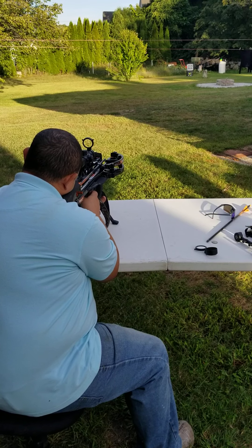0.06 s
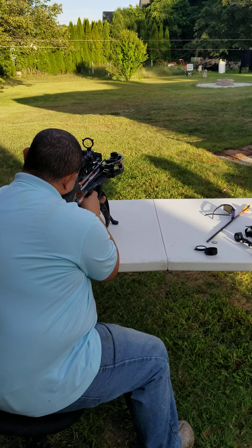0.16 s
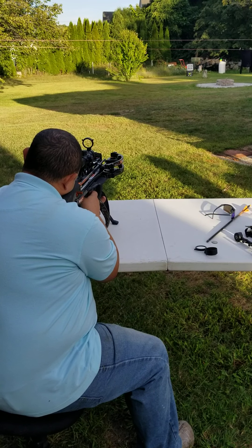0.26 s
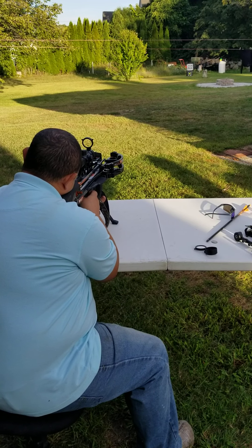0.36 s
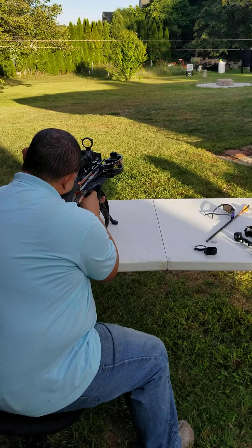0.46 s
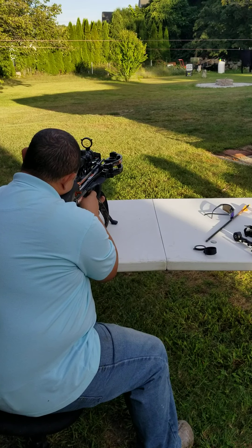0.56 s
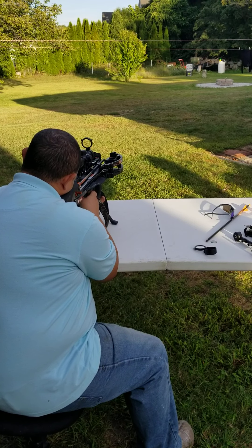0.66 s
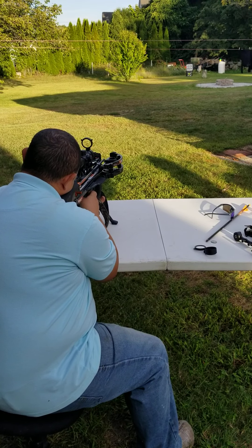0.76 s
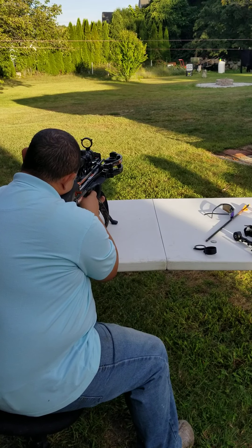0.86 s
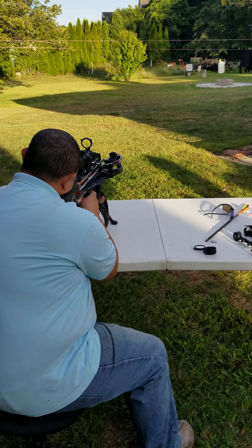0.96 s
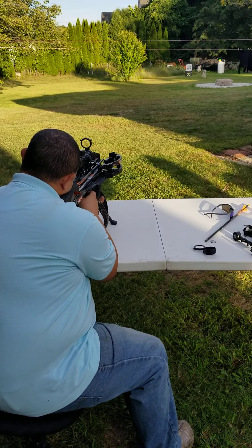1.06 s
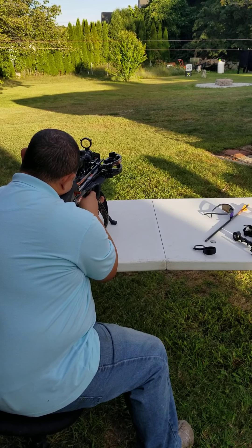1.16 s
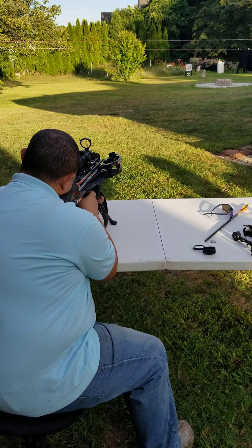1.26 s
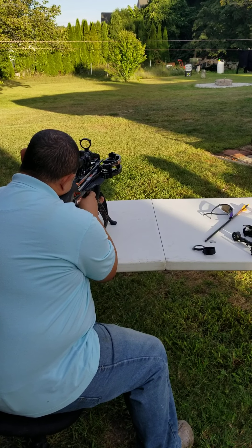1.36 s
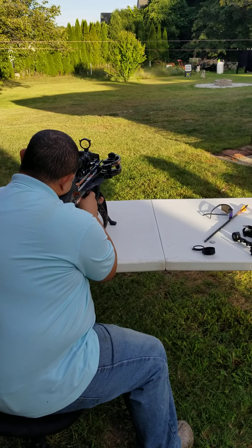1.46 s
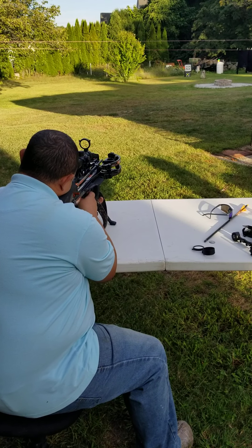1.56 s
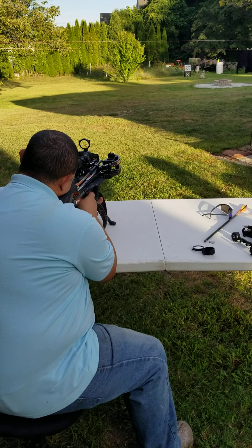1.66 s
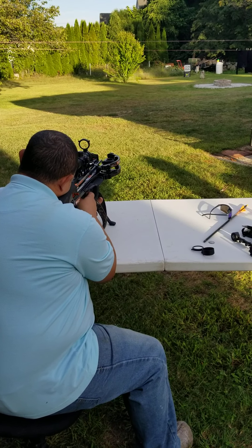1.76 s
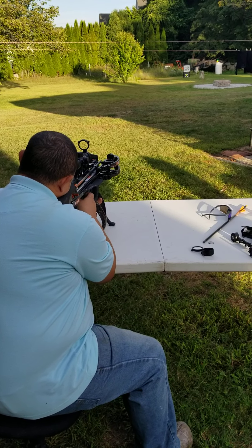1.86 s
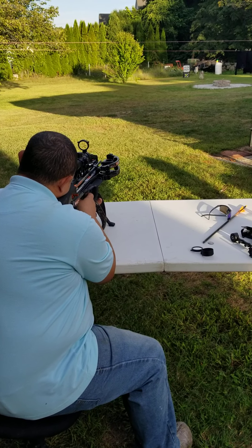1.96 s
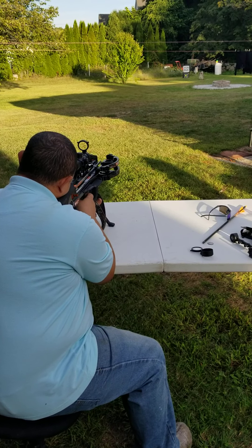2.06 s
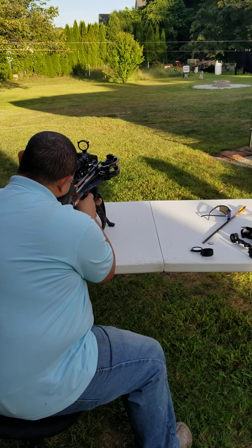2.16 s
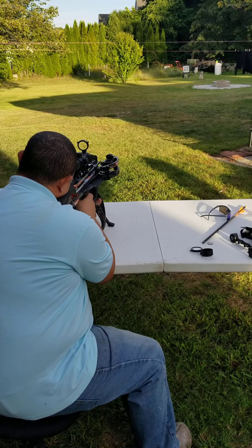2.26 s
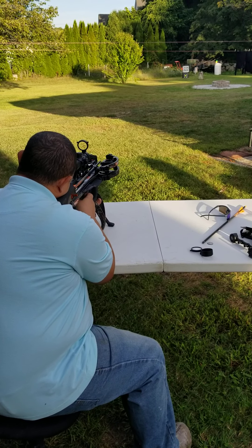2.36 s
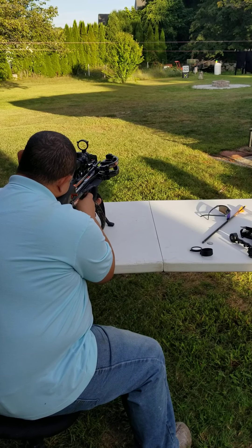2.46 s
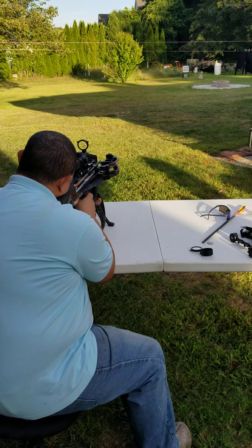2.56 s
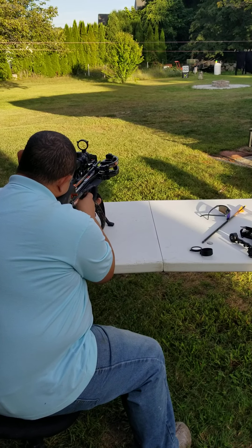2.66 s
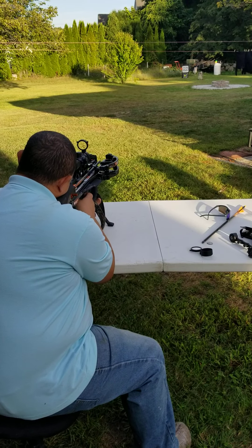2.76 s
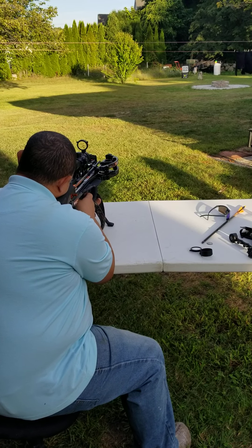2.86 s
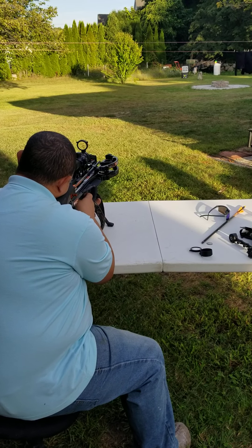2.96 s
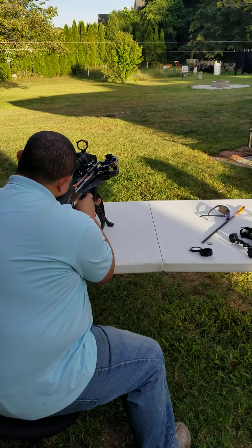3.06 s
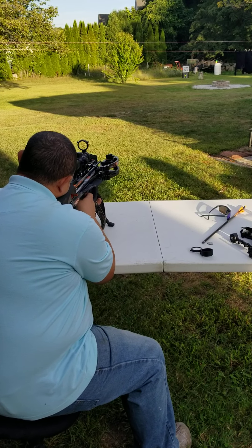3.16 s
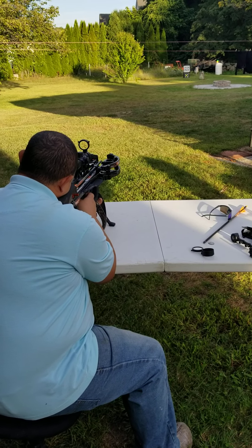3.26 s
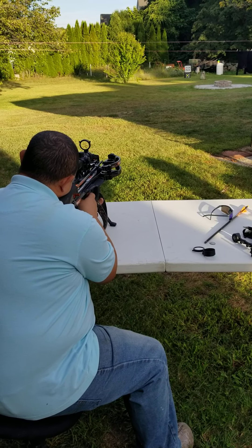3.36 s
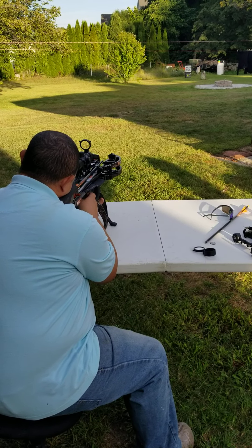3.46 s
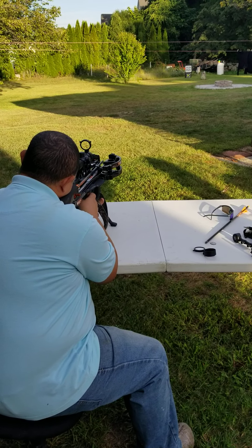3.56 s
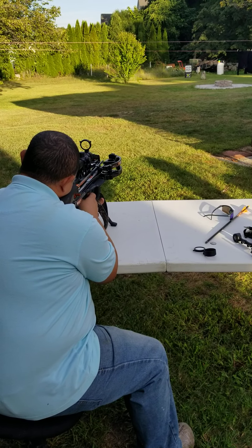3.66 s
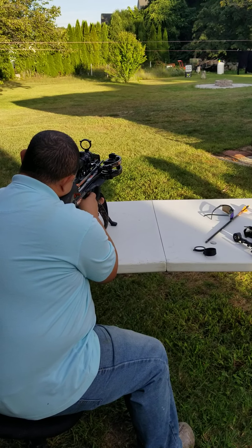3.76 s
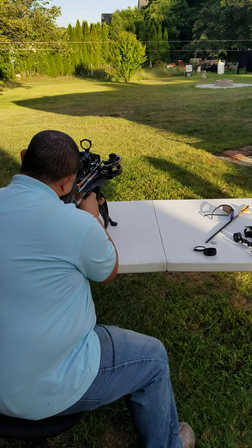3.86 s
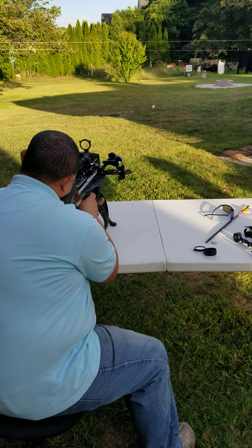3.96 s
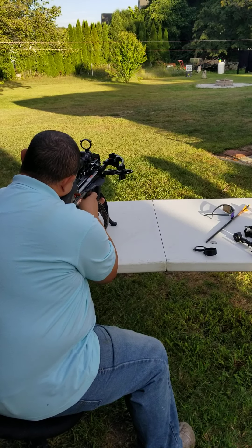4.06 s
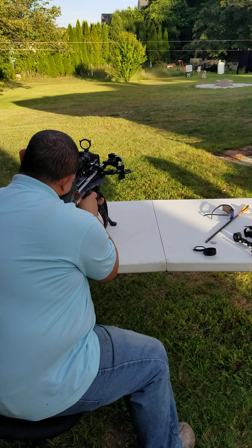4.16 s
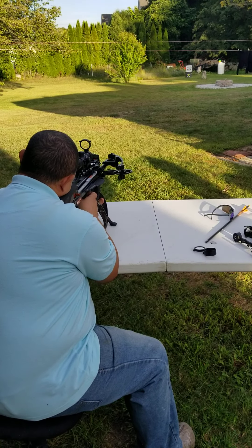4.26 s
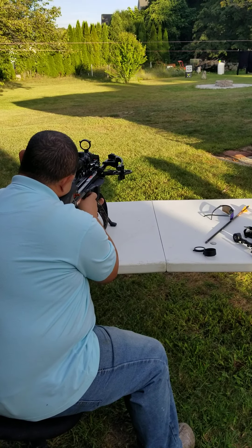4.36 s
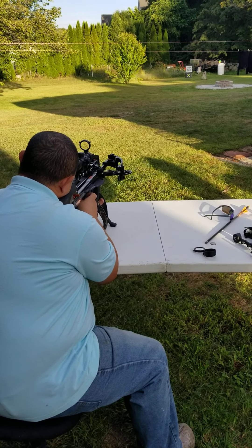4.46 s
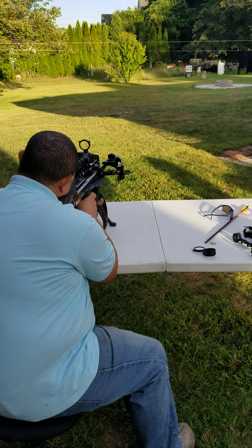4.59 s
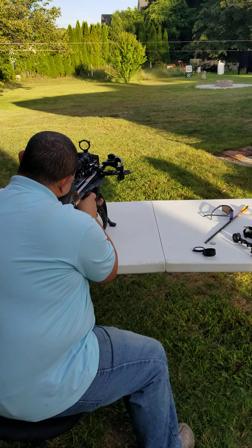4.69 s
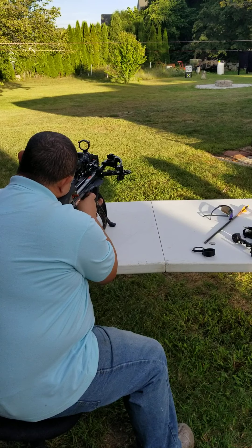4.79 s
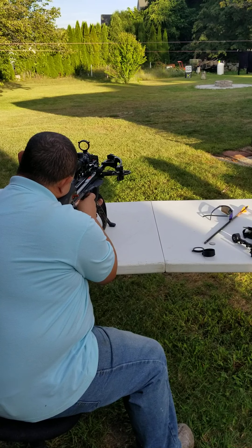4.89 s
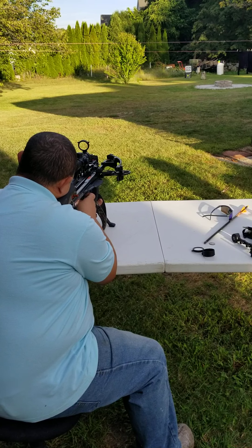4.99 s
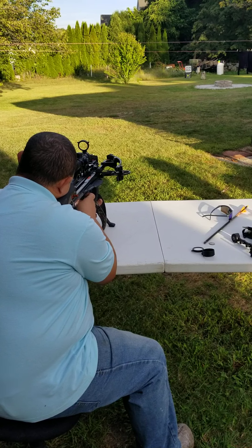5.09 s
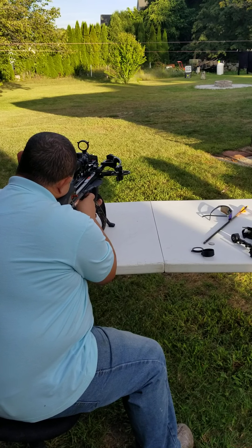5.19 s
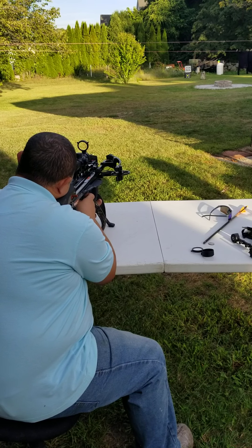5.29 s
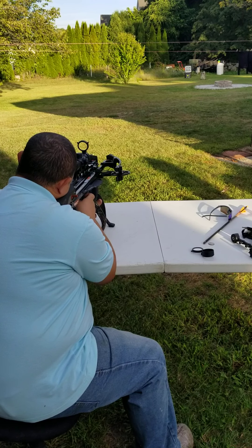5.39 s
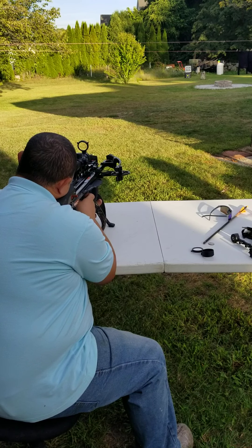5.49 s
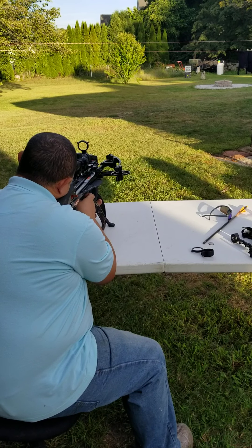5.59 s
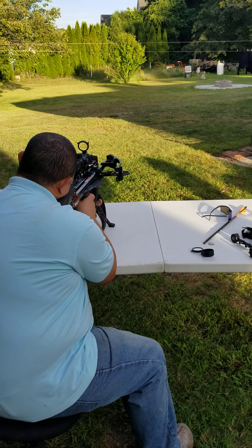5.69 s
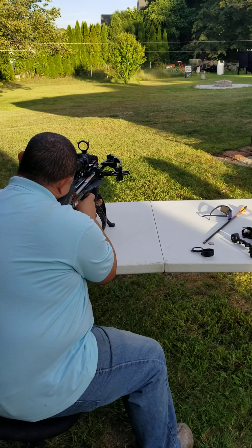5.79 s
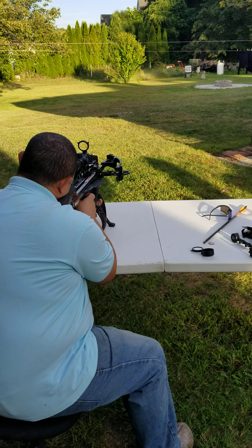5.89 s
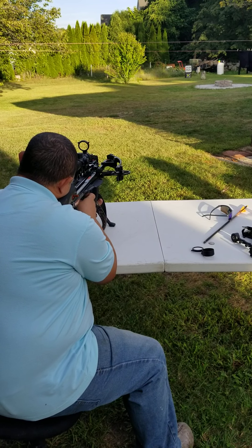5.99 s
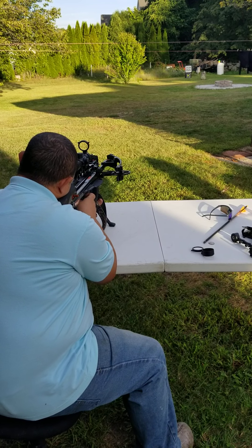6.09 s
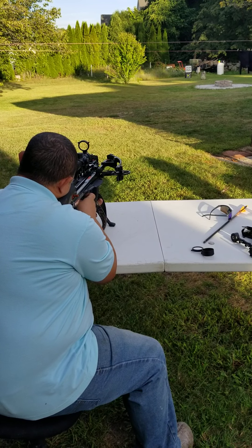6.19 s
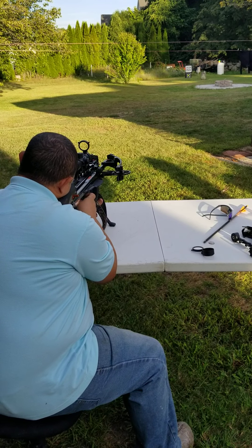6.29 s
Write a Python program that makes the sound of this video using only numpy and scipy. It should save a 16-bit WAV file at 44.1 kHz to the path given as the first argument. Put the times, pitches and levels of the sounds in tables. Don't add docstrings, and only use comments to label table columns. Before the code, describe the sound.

A quiet backyard hum with faint cricket and bird notes, then one sharp loud crossbow snap, and moments later a faint knock at a far target.

```python
import sys
import numpy as np
from scipy import signal
from scipy.io import wavfile
from scipy.ndimage import uniform_filter1d

SR = 44100
rng = np.random.default_rng(int(sys.argv[2]) if len(sys.argv) > 2 else 0)


def elevation(decibels):
    levels = np.asarray(decibels, float)
    return 10 ** (levels / 20)


def persist_wave(psi):
    counts = np.round(np.clip(psi, -1, 1) * 32767).astype(np.int16)
    wavfile.write(sys.argv[1], SR, np.atleast_2d(counts).T)


N = 279594
T = np.arange(N) / SR
DUCK_DB = 23

SNAP_TIMES = [
    3.9808,
    3.9822,
    3.9892,
    3.9975,
    4.0115,
]
# (frequency [Hz], left minus right [dB])
BOW_LEAN = [(300, -1.5), (4000, 0.5), (7000, 1), (11000, -3), (15000, 12)]
# (frequency [Hz], level [dB per Hz])
THIN_COLOUR = [(8600, -40.5), (9800, -11), (12000, -5), (14500, 1.5), (16000, -5.5)]


def evened(x):
    return x / np.sqrt(np.mean(x ** 2) + 1e-20)


def read(points, hz):
    f, value = np.transpose(points)
    return np.interp(np.log(hz + 1), np.log(f + 1), value)


def coloured(x, colour):
    hz = abs(np.fft.fftfreq(4096, 1 / SR))
    log_gain = np.log(elevation(np.maximum(read(colour, hz), -100)))
    phase = -signal.hilbert(log_gain).imag
    taps = np.fft.ifft(np.exp(log_gain + 1j * phase)).real[:2048]
    return signal.oaconvolve(x, taps / np.linalg.norm(taps))[:len(x)]


def whistle(hz, width, steady=0.):
    r = np.exp(-np.pi * width / SR)
    a, b = signal.lfilter([1], [1, -2 * r, r * r], rng.standard_normal((2, 2, len(hz))))
    slow = (a + 1j * b) / np.sqrt(np.mean(a ** 2))
    slow[1] = slow[0] + 0.11 * slow[1]
    carrier = np.exp(2j * np.pi * np.cumsum(hz) / SR)
    return ((steady + slow) * carrier).real * np.sqrt(2 / (2 + steady ** 2))


def ported(level, colour, same, lean):
    a, b = rng.standard_normal((2, N))
    same = np.clip(same, -1, 1)
    left, right = level * np.array([a, same * a + np.sqrt(1 - same ** 2) * b])
    left_colour = [(f, db + read(lean, f) / 2) for f, db in colour]
    right_colour = [(f, db - read(lean, f) / 2) for f, db in colour]
    return np.array([coloured(left, left_colour), coloured(right, right_colour)])


def bursts(rows, colour, same=.6, lean=((100, 0), (9000, 0))):
    level = np.zeros((2, N))
    for s, db, rise_ms, t60_ms, pan_db in rows:
        ms = np.arange(0, 3 * t60_ms, 1000 / SR)
        shape = np.minimum(ms / rise_ms, 1) * elevation(-60 * ms / t60_ms)
        part = level[:, round(s * SR):][:, :len(ms)]
        part += elevation([[db + pan_db / 2], [db - pan_db / 2]]) * shape[:part.shape[1]]
    return ported(level, colour, same, lean)


def clicks(rows, colour):
    spikes = np.zeros((2, N))
    for s, db, pan_db in rows:
        at = round(s * SR) + np.array([0, 2])
        spikes[[0, 1], at] = -elevation([db + pan_db / 2, db - pan_db / 2])
    return np.array([coloured(x, colour) for x in spikes])


def wash():
    # (frequency [Hz], level [dB per Hz])
    wash_colour = [(18, -38), (30, -15), (70, -6.5), (109, -8), (303, -20.5), (600, -24), (962, -20),
                   (1630, -24), (2480, -35), (5310, -47), (7090, -40.5), (7870, -55), (8520, -99),
                   (11700, -61.5), (16000, -62)]
    # (frequency [Hz], likeness of the ports [-1 to 1])
    wash_same = [(60, 0.99), (180, 0.95), (550, 0.8), (1650, 0.25), (4970, -0.37), (15000, 0.36)]
    # (frequency [Hz], left minus right [dB])
    wash_lean = [(60, -1.5), (180, 0), (550, 0.5), (1650, -2.5), (4970, 0), (15000, 7)]
    count, hz = N // 512 + 5, np.fft.rfftfreq(2048, 1 / SR)
    a, b, c, d, patches = rng.standard_normal((count, 1025, 5)).T
    patches = uniform_filter1d(patches, size=20, axis=0)
    patches = evened(uniform_filter1d(patches, size=10, axis=1))
    same = np.clip(read(wash_same, hz), -1, 1)[:, None]
    left = a + 1j * b
    right = same * left + np.sqrt(1 - same ** 2) * (c + 1j * d)
    lean = elevation(read(wash_lean, hz) / 2)[:, None]
    spectra = np.array([left * lean, right / lean])
    spectra = spectra * elevation(read(wash_colour, hz)[:, None] + 0.66 * patches)
    return elevation(-37) * evened(signal.istft(spectra, nperseg=2048, noverlap=1536)[1][:, :N])


def hum():
    # (time [s], shaft speed [Hz])
    shaft_curve = [(0, 68.92), (2.9, 67.86), (5.3, 66.35), (6.34, 65.8)]
    # (time [s], level before gain control [dB])
    hum_curve = [(0, -36), (1.2, -44.5), (2, -36), (3.1, -37.5), (3.9, -36.5), (4.6, -41), (5.3, -40),
                 (5.6, -31), (6.34, -30.5)]
    # (multiple of shaft speed [-], level [dB])
    hum_orders = [(2, -2), (3, -9.5), (4, -18.5), (5, -20.5), (6, -21.5), (8, -23)]
    hz = np.interp(T, *np.transpose(shaft_curve))
    tones = sum(elevation(db) * whistle(order * hz, 5.7, 4.5) for order, db in hum_orders)
    return elevation(np.interp(T, *np.transpose(hum_curve))) * tones


def engine():
    # (time [s], firing rate [Hz], level [dB])
    engine_curve = [(0, 84.1, -34.5), (.45, 83.9, -42.5), (.75, 84.4, -33), (1.001, 85.1, -39.5),
                    (1.18, 87.04, -24), (1.37, 91.06, -35.5), (1.7, 92.5, -30), (1.82, 94.1, -41),
                    (2.0, 94.5, -32.5), (2.3, 95, -43.5), (2.431, 95, -30.5), (2.65, 95, -33),
                    (2.9, 94.95, -27), (3.4, 94.8, -33.5), (3.55, 83, -30.5), (4.0, 82.1, -36),
                    (4.8, 94.46, -46), (6.34, 102, -39.5)]
    s, *columns = np.transpose(engine_curve)
    hz, db = (np.interp(T, s, column) for column in columns)
    return elevation(db) * whistle(hz, 43, 3.0) + elevation(-41.5) * whistle(hz * .53, 20)


def chorus():
    # (centre [Hz], width [Hz], level [dB])
    insect_bands = [
        (4140, 980, -65),
        (7040, 340, -70.5),
        (1784, 580, -55),
    ]
    swell_s, swell_db = 4.6, 8.5
    bands = []
    for hz, width, db in insect_bands:
        ports = [whistle(np.full(N, hz), width)[0] for _ in range(2)]
        bands.append(elevation(db) * np.array(ports))
    swell = elevation(swell_db * np.clip((T - swell_s) * 10, 0, 1))
    return sum(bands) + (swell - 1) * bands[1]


def hiss():
    # (time [s], level [dB])
    hiss_curve = [(0, -92.5), (5.43, -84), (5.451, -100), (6.34, -94)]
    return ported(elevation(np.interp(T, *np.transpose(hiss_curve))), THIN_COLOUR, 0, BOW_LEAN)


def notes():
    # (start [s], end [s], throbs [per s])
    note_spans = [(1.728, 2.075, 38.4), (1.728, 2.075, 38.4), (2.185, 2.237, 2), (.68, .92, 38),
                  (1.75, 2.25, 36), (5.5, 6.2, 38), (2.158, 2.176, 2)]
    # (base pitch [Hz], top pitch of the slide [Hz], level [dB])
    note_pitches = [(3620, 3820, -52.5), (3480, 3620, -63), (5170, 5330, -63.5), (4130, 4200, -69.5),
                    (4120, 4130, -69), (3750, 3850, -68), (4080, 4120, -65)]
    out = np.zeros((2, N))
    for (t0, t1, throbs), (hz0, hz1, db) in zip(note_spans, note_pitches):
        t = np.arange(0, t1 - t0, 1 / SR)
        u = t / (t1 - t0)
        throb = .36 + np.sin(np.pi * throbs * t + 1.95) ** 2
        slide = (hz1 - hz0) * np.sin(np.pi * (.05 + .75 * u)) ** .6
        hz = hz0 + slide + 60 * np.sin(2 * np.pi * throbs * t)
        swell = np.sin(np.pi * u) ** .2
        out[:, round(t0 * SR):][:, :len(t)] += elevation(db) * throb * swell * whistle(hz, 260, 3.2)
    return out * elevation([[1.5], [-1.5]])


def ticks():
    # (time [s], peak [dB], rise [ms], fall by 60 dB [ms], left minus right [dB])
    thin_ticks = [
        (2.395, -82, 3, 79.3, 3),
    ]
    # (time [s], peak [dB], rise [ms], fall by 60 dB [ms], left minus right [dB])
    dull_ticks = [
        (4.394, -48.5, 2.8, 60, -1),
        (4.6585, -64, 0.31, 13, -0.5),
        (5.44, -55, 0.31, 15.6, -14),
    ]
    # (time [s], peak [dB], left minus right [dB])
    knocks = [
        (4.6588, -28.5, 2),
        (5.4405, -56, 0),
    ]
    # (frequency [Hz], level [dB per Hz])
    dull_colour = [(60, -8), (200, 0), (500, -4), (1200, -14), (2800, -24), (4000, -40), (14000, -42)]
    dull = bursts(dull_ticks, dull_colour, 0.59) + clicks(knocks, dull_colour)
    return dull + bursts(thin_ticks, THIN_COLOUR, .6)


def gain_control():
    drop_s, fall_s, drop_db = 3.972, .008, -23.5
    sag_db, sag_until_s, creep_db_per_s = -2.5, 4.53, 2.5
    fall = drop_db * np.clip((T - drop_s) / fall_s, 0, 1)
    sag = sag_db * np.clip((T - drop_s) / (sag_until_s - drop_s), 0, 1)
    return elevation(fall + sag + creep_db_per_s * np.maximum(T - sag_until_s, 0))


def snaps():
    # (peak [dB], rise [ms], fall by 60 dB [ms], left minus right [dB])
    snap_shapes = [
        (-23.5, 0.56, 15, 4.5),
        (-15, 0.27, 31, -2.5),
        (-13.5, .4, 6.9, 7),
        (-27, 2.1, 49, 0.5),
        (-28.5, 3, 61, -1.5),
    ]
    # (frequency [Hz], level [dB per Hz])
    snap_colour = [(120, -46), (300, -12), (900, -2.5), (2000, -1.5), (2960, -15), (4130, -9.5),
                   (5200, -11.5), (6800, -14), (8030, -29), (11000, -17), (15000, -5), (16500, -24)]
    rows = [(s, *row) for s, row in zip(SNAP_TIMES, snap_shapes)]
    return bursts(rows, snap_colour, 0.11, BOW_LEAN)


def limbs():
    # (pitch [Hz], peak [dB], delay [ms], rise [ms], fall by 60 dB [ms], left minus right [dB])
    limb_rings = [(6800, -15, 0, .4, 10, 7), (6800, -15.5, 7.2, .3, 8, 10), (4200, -9, .4, 1.2, 13, -3),
                  (1700, -17, 0, 1.2, 12, 4), (2020, -17, 0, .8, 16, 0), (950, -16.5, 1.8, 1.8, 20, 2),
                  (190, -26, 6.5, 2.5, 30, 12), (440, -34, 12, 8, 140, 0), (870, -32, 10, 8, 120, 0),
                  (1320, -35, 10, 8, 130, 0), (445, -55, 125, 25, 220, 0), (885, -56, 105, 20, 180, 0)]
    out = np.zeros((2, N))
    ms = np.arange(SR // 2) * 1000 / SR
    starts = rng.random((len(limb_rings), 2, 1))
    for (hz, db, delay_ms, rise_ms, t60_ms, pan_db), start in zip(limb_rings, starts):
        ring = elevation(db - 60 * np.minimum(ms / t60_ms, 3)) * np.minimum(ms / rise_ms, 1)
        offset = np.cumsum(start * [[1], [hz / 12000]], axis=0)
        turn = hz * ms / 1000 + offset
        at = round((SNAP_TIMES[1] + delay_ms / 1000) * SR)
        out[:, at:at + len(ms)] += elevation([[pan_db / 2], [-pan_db / 2]]) * ring * np.sin(2 * np.pi * turn)
    return out


def yard():
    # (time [s], peak [dB], rise [ms], fall by 60 dB [ms], left minus right [dB])
    near_echoes = [
        (3.986, -25, 18, 99, 1),
        (4.008, -34.5, 7.3, 140, 1),
        (4.0, -59, 10, 1100, 0),
    ]
    # (frequency [Hz], level [dB per Hz])
    near_colour = [(120, -31.5), (200, -5), (411, -6.5), (770, -9), (844, -2), (1130, -19.5), (1340, -9.5),
                   (1550, -20), (1940, -10), (6320, -11), (8810, -28.5), (15000, -18), (16500, -27)]
    # (time [s], peak [dB], rise [ms], fall by 60 dB [ms], left minus right [dB])
    far_echoes = [
        (4.02, -33.5, 26, 95, 0.0014),
        (4.118, -47, 29, 140, 0),
        (4.03, -60.5, 20, 1330, 0),
    ]
    # (frequency [Hz], level [dB per Hz])
    far_colour = [(100, -27), (300, 2.5), (500, -3), (1500, -6.5), (2600, -10.5), (4000, -23.5),
                  (7000, -28), (15000, -37.5)]
    near = bursts(near_echoes, near_colour, .2, BOW_LEAN)
    return near + bursts(far_echoes, far_colour, 0.5, BOW_LEAN)


def puff():
    # (dent [dB], dent decay [ms], swing [dB], swing pitch [Hz], swing decay [ms])
    puff_settings = (-0.9, 3, -1, 55, 22)
    dent_db, dent_ms, swing_db, hz, swing_ms = puff_settings
    ms = np.maximum(T - 3.9893, 0) * 1000
    onset = 1 - np.exp(-(ms / 0.13) ** 2)
    dent = -elevation(dent_db) * onset * np.exp(-np.maximum(ms - .4, 0) / dent_ms)
    turn = hz * ms / 1000 + 0.073 * (1 - np.exp(-ms / 7.7))
    wave = np.sin(2 * np.pi * turn)
    swing = elevation(swing_db) * np.exp(-(ms / swing_ms) ** 2) * wave
    settle = elevation(-33.5) * np.exp(-ms / 45) * wave
    return np.array([-.17 * swing, dent + swing + settle])


def impact():
    # (time [s], peak [dB], left minus right [dB])
    cracks = [
        (4.3914, -14.5, 3),
        (4.3934, -25, 0),
        (4.3959, -26, 5),
    ]
    # (time [s], peak [dB], rise [ms], fall by 60 dB [ms], left minus right [dB])
    strikes = [
        (4.3916, -43, .2, 12, 0),
        (4.3933, -44, .2, 9, -1),
        (4.3962, -48, .3, 25, 1),
    ]
    # (frequency [Hz], level [dB per Hz])
    strike_colour = [(200, -26), (1500, -30), (3900, -20), (4800, 1), (5400, -6), (6200, -2), (7400, -7),
                     (9000, -33), (12500, -19), (15500, -14), (16500, -29)]
    # (time [s], peak [dB], rise [ms], fall by 60 dB [ms], left minus right [dB])
    hedge_echoes = [
        (4.398, -61, 4, 450, 0),
        (4.45, -70, 4.3, 54, 0),
    ]
    # (frequency [Hz], level [dB per Hz])
    hedge_colour = [(500, -22), (2000, -5), (4500, -4), (7000, -8), (8600, -36), (14000, -22), (16500, -27)]
    strike = clicks(cracks, strike_colour) + bursts(strikes, strike_colour, 0.57)
    return strike + bursts(hedge_echoes, hedge_colour, 0.2)


def target_body():
    # (time [s], peak [dB], rise [ms], fall by 60 dB [ms], left minus right [dB])
    thuds = [
        (4.3925, -51.5, 1.8, 49, 0),
    ]
    # (frequency [Hz], level [dB per Hz])
    thud_colour = [(300, -26), (1250, -1), (1650, -10), (2050, 1), (2400, -9), (2800, -3), (3600, -18)]
    return bursts(thuds, thud_colour, .6)


def scene():
    steady = wash() + hum() + engine() + chorus() + notes()
    bow = snaps() + limbs() + yard() + puff()
    loud_events = ticks() + bow + impact() + target_body()
    return steady + elevation(DUCK_DB) * loud_events


def top_cut(x):
    return signal.sosfilt(signal.butter(12, 16680, fs=SR, output="sos"), x)


def record(dry):
    x = dry * gain_control() + hiss()
    low_pass = signal.firwin(301, 16000, window=("kaiser", 8), fs=SR)
    x = signal.oaconvolve(x, low_pass[None], "same")
    return top_cut(x)


dry = scene()
out = record(dry)
persist_wave(out)
```